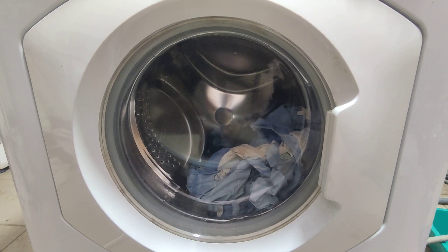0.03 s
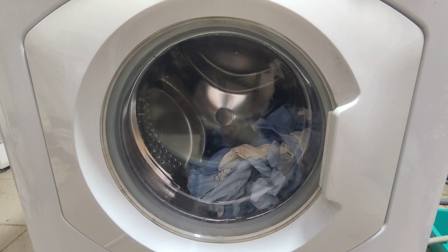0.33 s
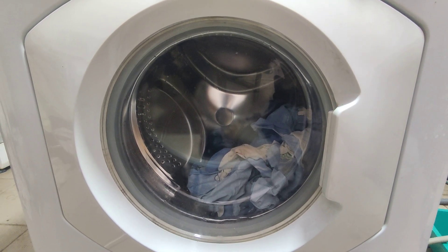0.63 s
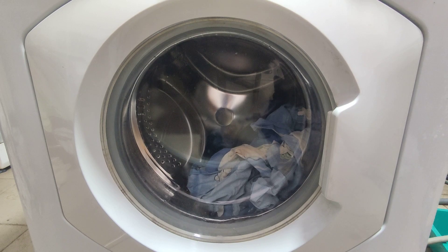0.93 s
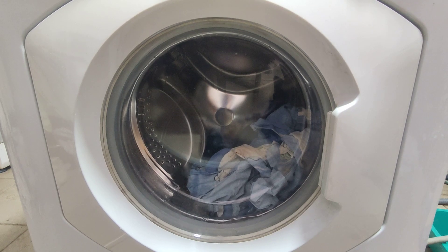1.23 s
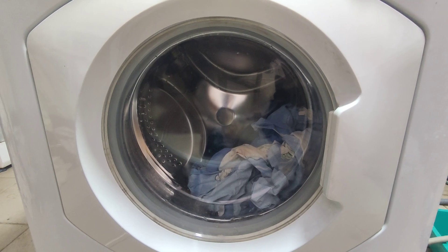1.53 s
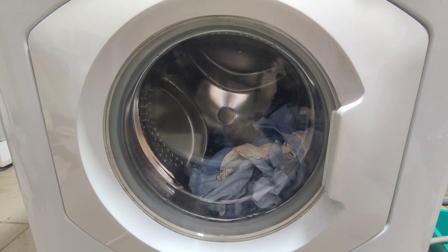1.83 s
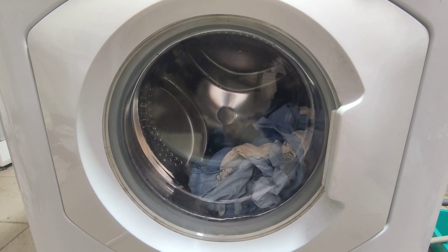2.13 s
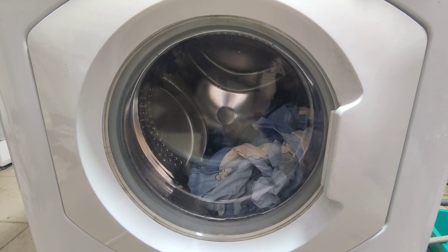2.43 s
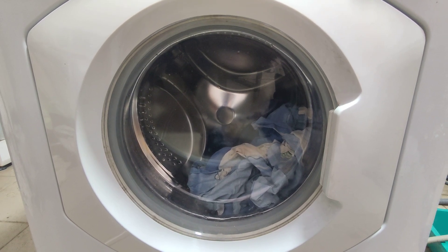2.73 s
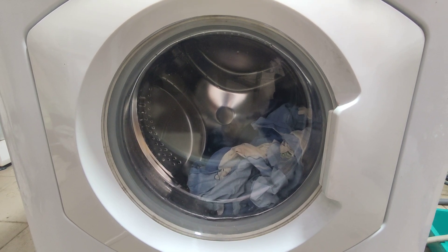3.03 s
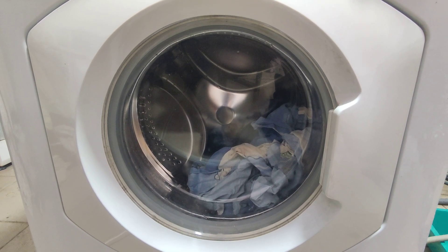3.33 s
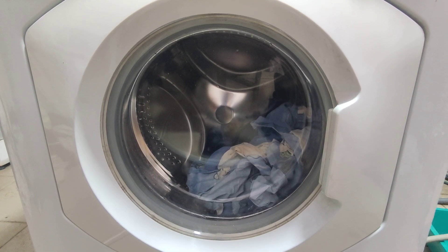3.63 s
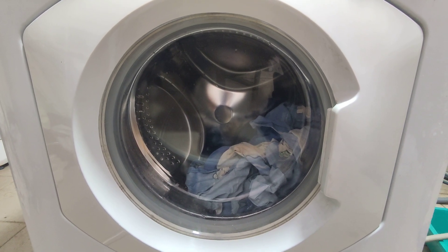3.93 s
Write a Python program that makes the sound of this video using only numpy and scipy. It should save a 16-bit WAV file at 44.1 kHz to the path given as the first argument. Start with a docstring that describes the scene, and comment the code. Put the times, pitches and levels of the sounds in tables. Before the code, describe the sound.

Close by in a small room, water sprays and gurgles into a front-loading washing machine with a low hum. The flow cuts off with a light knock, and the last water trickles and drips over quiet room noise.

```python
"""Washing machine filling

A front-loader takes in water, heard from just outside its door in a small room. A fluttering jet sprays
into the inlet tray, the hose hums, and the water drums and gurgles down into the tub. The valve shuts
with a thump; the rest trickles away in gulps, drips and small ticks over quiet room noise."""
import sys
import numpy as np
from scipy import signal
from scipy.fft import rfft, irfft
from scipy.io import wavfile
from scipy.ndimage import uniform_filter1d

SR = 44100
rng = np.random.default_rng(int(sys.argv[2]) if len(sys.argv) > 2 else 0)


def materialize(psi):
    """Save the field psi as 16-bit PCM at rate SR to the path in sys.argv[1].

    A 1-D psi becomes a single channel; in a 2-D psi each row is a channel.
    """
    bounded = np.clip(np.atleast_2d(psi).T, -1, 1)
    quanta = np.round(bounded * 32767).astype(np.int16)
    wavfile.write(sys.argv[1], SR, quanta)


N = 176400
T = np.arange(N) / SR
SHUT_S = 1.993  # the valve closes
PAN = np.array([[.5], [-.5]])  # splits a pan (left minus right, dB) between the channels


def spray(flutter_hz=93.2, drift_hz=1.3, gust_db=0.5, mist_db=-1, spit_db=-7):
    """The jet breaks into pulses of droplets that patter on the tray; some pulses spit brightly."""
    # strength of the jet: t/s, level/dB
    jet = [(0.0, -35.5), (0.054, -40), (0.418, -36.5), (0.512, -40), (0.578, -39), (0.606, -39),
           (0.638, -39.5), (0.716, -39), (0.864, -39), (0.954, -40.5), (1.024, -37), (1.224, -39),
           (1.278, -36), (1.312, -38.5), (1.98, -38.5)]
    # tone of the spray in the tray: f/Hz, level/dB
    tone = [(900, -34), (1900, -9), (2900, -11.5), (3650, -6), (4230, -0.55), (4480, -1.5), (4750, -7.5),
            (5680, -11.5), (6300, -7.5), (7000, -7.5), (7600, -2.5), (8250, -2.5), (8850, -8), (9450, -4),
            (10300, -13), (11400, -17.5), (11750, -7.5), (13500, -20), (15500, -23.5)]
    # stereo image of the spray: f/Hz, pan/dB
    image = [(2000, 3), (4000, 0.5), (7200, 3), (8300, -11), (9300, 5.5), (11200, 11), (15000, 6.5)]

    def gain(f):
        sides = amp(PAN * read(image, f))
        return amp(read(tone, f)) * sides / np.linalg.norm(sides, axis=0)
    flutter = np.cos(2 * np.pi * np.cumsum(flutter_hz + drift_hz * wander(8.8)) / SR)
    pulse = (1 + 0.1 * flutter) * amp(gust_db * wander(30))
    patter = pulse * (unit(impacts(per_s=7000, spread_db=2.8)) + amp(mist_db) * noise())
    bright = np.diff(rng.standard_normal(N), prepend=0)
    spit = bright * np.exp(3 * flutter) * amp(5 * np.clip(wander(31), -2, 2))
    hiss = cavity(unit(patter), decay_s=0.014, wet_db=-7, even_hz=160)
    hiss += amp(spit_db) * unit(cavity(spit, decay_s=0.0038, wet_db=-1.5, even_hz=600))
    return colour(hiss, gain) * level(jet) * amp(4) * fade(SHUT_S, db_per_s=215)


def pour(wash_db=2, surge_db=0.58):
    """Water gurgles evenly down the tub wall: bubbles in a churning wash."""
    # tone of the falling water: f/Hz, level/dB
    tone = [(30, -46), (52, -38), (75, -7.5), (115, -5), (145, 2.5), (200, 2.5), (420, -1), (600, -.5),
            (1150, -1), (1260, -8), (1400, -2.5), (1780, -4.5), (2000, -10.5), (3000, -8.5), (8000, -34)]
    # flow down into the tub: t/s, level/dB
    runoff = [(0, -39), (.5, -37.5), (1.2, -38), (1.65, -38.5), (2.02, -39.5), (2.09, -48), (2.18, -58.5),
              (2.45, -61), (2.6, -63.5), (3.2, -68.5), (4, -71)]
    swarm = bubbles(338, 2213, per_s=1100, spread_db=1.6, cycles=4, sizes=30)
    gurgle = colour(cavity(swarm, decay_s=0.0094, wet_db=0, even_hz=120), eq(tone))
    wash = colour(noise(), eq(tone))
    return unit(gurgle + amp(wash_db) * wash) * level(runoff) * amp(surge_db * wander(25))


def tub(body_db=-43.5, lag_s=0.045, surge_db=1):
    """The stream drums on the tub, which booms at its own resonances."""
    # resonances of the tub: f/Hz, rough width/Hz, level/dB
    modes = [(161.5, 9.5, -2), (197.6, 16, -8), (243.6, 24, -8), (303.6, 9.2, -4.5), (349.9, 7.1, -0.5),
             (385.7, 11.6, -7.5)]

    def gain(f):
        peaks = [amp(db) / (1 + ((f - hz) / (0.71 * width)) ** 2) for hz, width, db in modes]
        return np.linalg.norm(peaks, axis=0)
    boom = colour(noise(), gain)
    return boom * amp(body_db + surge_db * wander(6)) * fade(SHUT_S + lag_s, db_per_s=130)


def hose_hum(drift_hz=2.64, waver_db=1.8):
    """The running inlet hose hums one note that swells and wavers."""
    # note of the hose: t/s, f/Hz, level/dB
    note = [(0, 246, -48), (.26, 246, -38), (.42, 250, -55.5), (.65, 256, -43), (.83, 243.5, -43.5),
            (1.0, 257.7, -43.5), (1.08, 244, -53), (1.22, 245.7, -42.5), (1.33, 259, -47.5),
            (1.42, 245.7, -45.5), (1.74, 257.6, -41.5), (1.87, 246, -54), (1.98, 255, -45)]
    s, hz, db = np.transpose(note)
    turns = np.cumsum(np.interp(T, s, hz) + drift_hz * wander(12.6)) / SR
    swell = amp(np.interp(T, s, db) + 0.04 + waver_db * np.minimum(wander(14), 1))
    return np.sqrt(2) * np.sin(2 * np.pi * turns) * swell * fade(SHUT_S, db_per_s=200)


def drum(per_mode_per_s=65, spread_db=2):
    """Drops strike the steel drum here and there; each rings one of its modes."""
    # hollow ring of the drum: f/Hz, level/dB, decay/s
    modes = [(796, -5, 0.012), (1061, -6.5, 0.013), (1349, -3, 0.0071), (1426, 2, 0.0095)]
    # how hard the drops strike: t/s, level/dB
    patter = [(0, -47.5), (1.2, -48.5), (1.7, -46.5), (2, -47.5), (2.12, -69), (2.48, -61), (2.62, -74.5),
              (4, -82)]
    t = T[:SR // 10]
    rings = np.zeros(N)
    for hz, db, decay in modes:
        ring = amp(db) * np.exp(-t / decay) * np.sin(2 * np.pi * hz * t)
        rings += signal.oaconvolve(impacts(per_mode_per_s, spread_db), ring)[:N]
    return unit(room(np.array([rings, rings]), wet_db=-1)) * level(patter)


def thump(attack_s=0.0051):
    """The halted water column knocks the hose and the cabinet."""
    # knocks: delay after the valve/s, f/Hz, level/dB, decay/s
    knocks = [(.013, 514, -31, 0.013), (.015, 596, -29, 0.014), (.045, 135, -38, .035),
              (.06, 174, -42.5, 0.051)]
    out, t = np.zeros((2, N)), T[:SR // 2]
    for delay, hz, db, decay in knocks:
        envelope = amp(db) * (1 - np.exp(-t / attack_s)) * np.exp(-t / decay)
        ring = envelope * np.sin(2 * np.pi * hz * t)
        add(out, SHUT_S + delay, np.array([ring, ring]))
    return out


def drips():
    """Drips plink into the tub."""
    # drips: t/s, level/dB, f/Hz, pan/dB
    hits = [(1.607, -27.5, 1098, -7), (1.683, -33, 1410, -3), (1.755, -31, 1440, -5),
            (2.144, -40.5, 620, -3), (2.239, -41.5, 1390, -3), (2.389, -40.5, 645, -3),
            (2.386, -43.5, 1320, -5), (2.722, -47, 1420, -2), (2.802, -46, 1090, 3), (3.003, -39, 1510, 0),
            (3.029, -46.5, 1400, -2), (3.26, -44, 1370, 0), (3.336, -47, 610, -1), (3.754, -53, 780, 0)]
    plinks = drops(hits, ring_s=0.003, splash=0.36, gain_db=-0.5, band_ratio=1.24)
    return room(cavity(plinks, decay_s=0.0059, wet_db=-4.5), wet_db=-3)


def ticks():
    """Small drops and bursting bubbles tick brightly."""
    # ticks: t/s, level/dB, f/Hz, pan/dB
    hits = [(2.1434, -52, 3320, -1), (2.5252, -57, 8840, -7), (2.6005, -59, 4000, 3),
            (2.6618, -58, 4630, -3.5), (2.7372, -57, 9000, -6), (2.8883, -67, 5100, 2),
            (3.037, -59, 2760, -2), (3.062, -68, 8800, -8), (3.1582, -53.5, 3340, 0),
            (3.2344, -63, 8200, -10), (3.3363, -59, 8500, -6), (3.5234, -61, 10700, 0),
            (3.6316, -62.5, 5550, -3.5), (3.6566, -63, 5250, -2)]
    clicks = drops(hits, ring_s=0.0012, splash=0.64, gain_db=3.5, band_ratio=1.2)
    return room(cavity(clicks, decay_s=0.007, wet_db=9), wet_db=1)


def trickle(film_db=-5):
    """The tray empties in a fading patter of tiny bubbles."""
    # tone of the trickle: f/Hz, level/dB
    tone = [(100, -25), (450, -13), (650, 4.5), (900, -3.5), (1150, -6), (1400, -3), (1700, -6.5),
            (2000, -15), (3000, -11), (4400, -17), (5200, -18), (7200, -23.5), (8400, -21), (10500, -24),
            (15000, -23)]
    # strength of the trickle: t/s, level/dB
    drain = [(1.9, -51), (2.2, -58), (2.48, -58.5), (2.6, -65.5), (2.74, -63), (2.95, -64), (3.5, -68),
             (4, -67)]
    swarm = bubbles(496, 14200, per_s=1600, spread_db=4, cycles=1.8, sizes=36)
    patter = room(cavity(swarm, decay_s=0.009, wet_db=1), wet_db=-1.5)
    return colour(unit(patter) + amp(film_db) * noise(), eq(tone)) * level(drain)


def slops(gulp_rise_s=0.0069, fizz_rise_s=0.024):
    """Each gush gulps in large bubbles, then breaks up into a fizz of small ones."""
    # last gushes out of the tray: t/s, gulp level/dB, fizz level/dB, length/s
    gushes = [(2.232, -54, -57.5, 0.095), (2.35, -69, -59, 0.11), (2.713, -63, -62.5, 0.055),
              (2.8, -55, -68, 0.042)]
    # tone of the gulp: f/Hz, level/dB
    tone = [(400, -28), (650, 7), (900, -4), (1450, 1), (2050, -20)]
    large = bubbles(574, 1660, per_s=1300, spread_db=0, cycles=3, sizes=14)
    gulp = colour(cavity(large, decay_s=0.0049, wet_db=-6), eq(tone))
    small = bubbles(2730, 4470, per_s=2000, spread_db=3, cycles=4.3, sizes=14)
    fizz = unit(cavity(small, decay_s=0.0042, wet_db=9))
    out = np.zeros((2, N))
    for s, gulp_db, fizz_db, length in gushes:
        age = np.maximum(T - s, 0)
        gush = gulp * amp(gulp_db) * np.minimum(age / gulp_rise_s, 1)
        gush += fizz * amp(fizz_db) * np.minimum(age / fizz_rise_s, 1)
        out += gush * np.exp(-2 * (age / length) ** 2)
    return out


def foam(level_db=-67, pan_db=-4):
    """Foam bursts in a soft fizz of fine pops that fades away."""
    pops = bubbles(7500, 9900, per_s=330, spread_db=2.6, cycles=7, sizes=24)
    fizz = unit(cavity(pops, decay_s=0.006, wet_db=5))
    return fizz * amp(level_db + PAN * pan_db) * fade(2.5, db_per_s=16)


def room_tone(floor_db=-58.5, waver_db=2):
    """Quiet, dull room noise that settles a little after the water stops."""
    # tone of the room noise: f/Hz, level/dB
    tone = [(25, -54), (50, -25), (85, -6), (170, -1.5), (260, -2.5), (350, -6.5), (450, -10.5),
            (580, -8.5), (700, -14), (1000, -11), (1650, -27), (1950, -27), (3000, -37), (5000, -33),
            (7300, -42), (11000, -45), (12500, -31), (15000, -39)]
    return colour(noise(), eq(tone)) * amp(floor_db + waver_db * wander(5.8)) * fade(3, db_per_s=1.5)


def drops(hits, ring_s, splash, gain_db, band_ratio):
    """Single drops: a short splash and the ring of a bubble."""
    out = np.zeros((2, N))
    for s, db, hz, pan_db in hits:
        ring = bubble(hz, ring_s)
        band = signal.butter(2, [hz / band_ratio, hz * band_ratio], "band", fs=SR, output="sos")
        burst = unit(signal.sosfilt(band, rng.standard_normal(len(ring))))
        burst *= np.exp(-T[:len(ring)] / ring_s)
        add(out, s, (ring + splash * burst) * amp(db + gain_db + PAN * pan_db))
    return out


def bubble(hz, ring_s, rise=0.021):
    """A bubble's dying ring, rising slightly in pitch."""
    age = np.arange(0, 6 * ring_s, 1 / SR) / ring_s  # in decay times
    return np.exp(-age) * np.sin(2 * np.pi * hz * ring_s * age * (1 + rise * age / 2))


def bubbles(lo_hz, hi_hz, per_s, spread_db, cycles, sizes):
    """A swarm of bubbles of many sizes, ringing at random moments."""
    swarm = np.zeros(N)
    for hz in np.linspace(lo_hz, hi_hz, sizes):
        births = impacts(per_s / sizes, spread_db)
        swarm += np.sqrt(hz) * signal.oaconvolve(births, bubble(hz, cycles / hz))[:N]
    return unit(swarm)


def impacts(per_s, spread_db):
    """Random clicks of uneven size."""
    size = amp(spread_db * np.minimum(rng.exponential(1, N), 4))
    return size * rng.choice([-1, 1], N) * (rng.random(N) < per_s / SR)


def cavity(x, decay_s, wet_db, even_hz=250):
    """Close reflections in the cabinet: a fine ripple on an even spectrum, different in each channel."""
    t = T[:4096]
    taps = rng.standard_normal((2, len(t))) * np.exp(-t / decay_s)
    taps *= amp(wet_db) / np.linalg.norm(taps, axis=1, keepdims=True)
    taps[0, 8] += 1  # the direct sound reaches the left a touch later
    taps[1, 0] += 1
    spectrum = np.fft.fft(taps)
    broad_power = uniform_filter1d(abs(spectrum) ** 2, round(even_hz * len(t) / SR), mode="wrap")
    flatten = np.exp(np.conj(signal.hilbert(-.5 * np.log(broad_power + 1e-9))))  # minimum-phase EQ
    taps = np.fft.ifft(spectrum * flatten).real
    return signal.oaconvolve(x * np.ones((2, 1)), taps, axes=1)[:, :N]


def room(x, wet_db):
    """Adds a diffuse tail whose treble dies first."""
    # ring of the tub and room: f/Hz, T60/s
    t60 = [(200, 0.84), (1400, 0.27), (4000, 0.24), (12000, 0.042)]
    hz, t, spectra = signal.stft(rng.standard_normal((2, SR // 2)), SR, nperseg=256)
    tail = signal.istft(spectra * amp(-60 * t / read(t60, hz)[:, None]), SR)[1]
    tail /= np.linalg.norm(tail[0])
    return x + amp(wet_db) * signal.oaconvolve(x, tail, axes=1)[:, :N]


def colour(x, gain):
    """Filters two unrelated channels by gain(Hz) and makes their bass alike; rms 1."""
    # likeness of the channels: f/Hz, coherence/0-1
    likeness = [(30, 0), (130, 0.98), (250, 0.92), (400, 0.23), (700, 0.11), (1200, 0.03), (15000, 0.01)]
    f = np.fft.rfftfreq(N, 1 / SR)
    left, other = rfft(x)
    same = read(likeness, f)
    right = same * left + np.sqrt(1 - same ** 2) * other
    return unit(irfft(np.array([left, right]) * gain(f), N))


def wander(hz):
    """Random drift, mostly slower than hz; rms 1."""
    f = np.fft.rfftfreq(N, 1 / SR)
    return unit(irfft(rfft(rng.standard_normal(N)) * (f > 0) / (1 + (f / hz) ** 2), N))


def noise():
    """Stereo white noise."""
    return rng.standard_normal((2, N))


def amp(db):
    """Decibels to gain."""
    return 10 ** (np.asarray(db) / 20)


def unit(x):
    """Scales to rms 1."""
    return x / np.sqrt(np.mean(x ** 2) + 1e-20)


def read(points, hz):
    """Reads a table on a log-frequency axis."""
    f, value = np.transpose(points)
    return np.interp(np.log(hz + 1), np.log(f + 1), value)


def eq(points):
    """Gain curve from f/Hz, level/dB points."""
    return lambda f: amp(read(points, f))


def level(points):
    """Gain envelope from t/s, level/dB points."""
    return amp(np.interp(T, *np.transpose(points)))


def fade(start_s, db_per_s):
    """Full gain until start_s, then a steady fade-out."""
    return amp(-db_per_s * np.maximum(T - start_s, 0))


def add(mix, s, sound):
    """Mixes a sound in at s seconds."""
    part = mix[:, round(s * SR):][:, :sound.shape[1]]
    part += sound[:, :part.shape[1]]


def scene():
    """The machine fills, the valve shuts and the tray runs dry."""
    droplets = drips() + ticks()
    filling = spray() + tub() + hose_hum() + pour() + drum()
    return droplets + filling + thump() + trickle() + slops() + foam() + room_tone()


def record(dry):
    """A steep high cut takes off the very top."""
    high_cut = signal.firwin(511, 15550, window=("kaiser", 9), fs=SR)
    return signal.oaconvolve(dry, high_cut[None], "same")


dry = scene()
out = record(dry)
materialize(out)
```